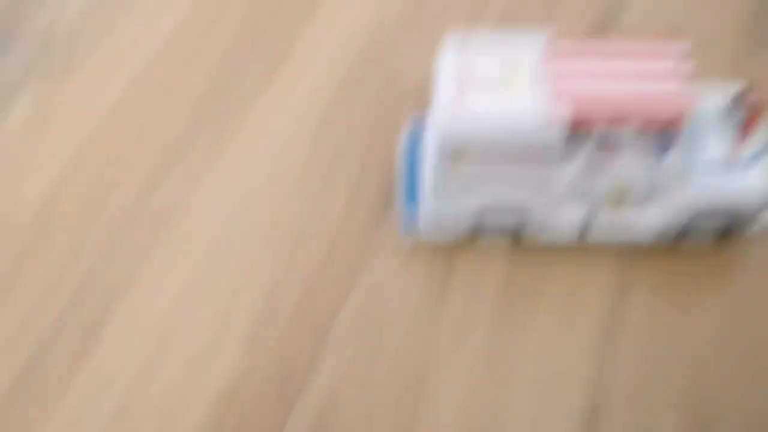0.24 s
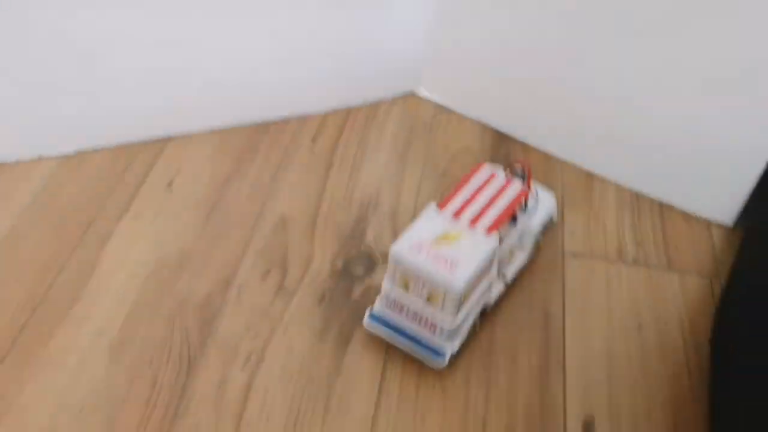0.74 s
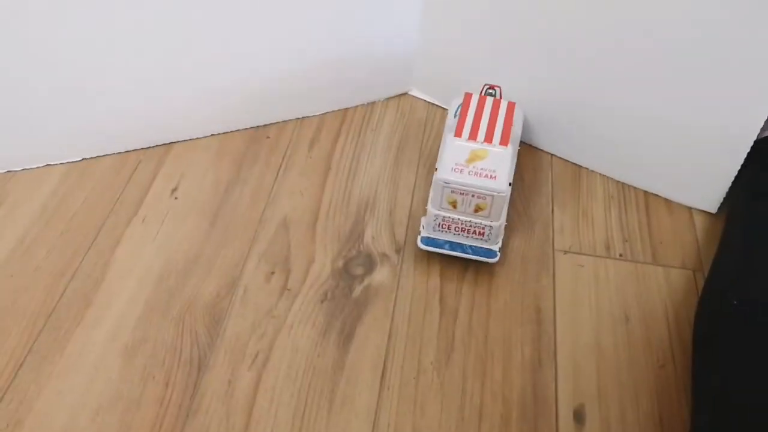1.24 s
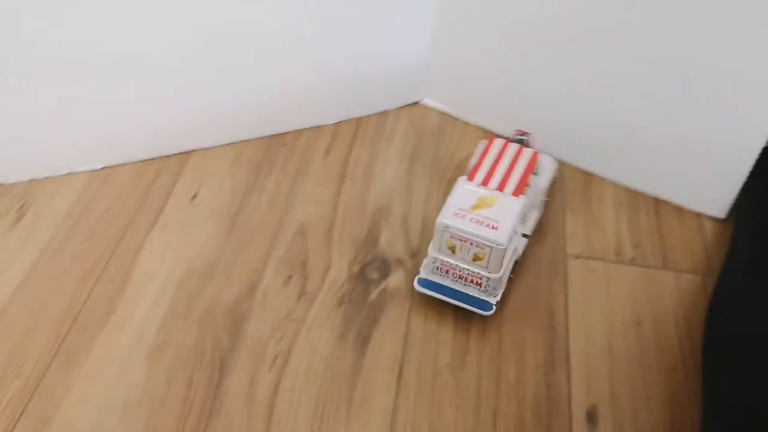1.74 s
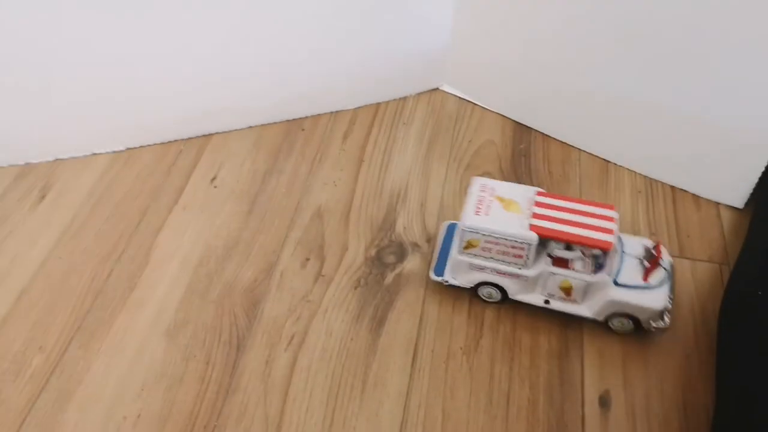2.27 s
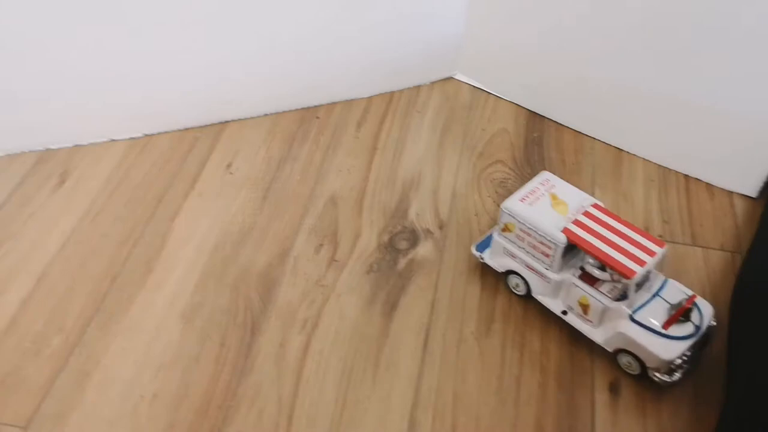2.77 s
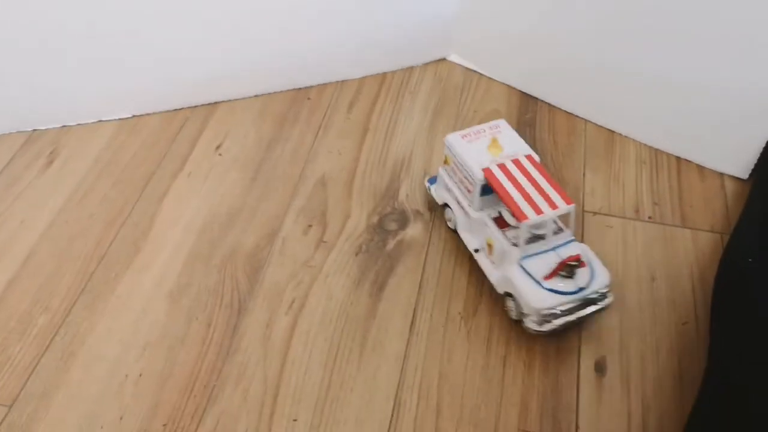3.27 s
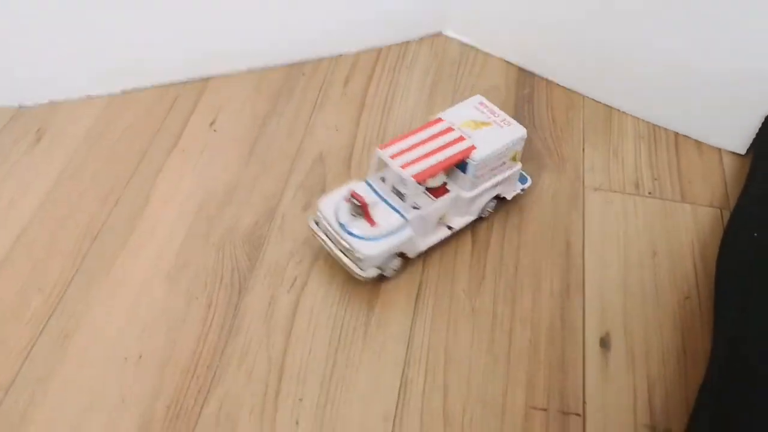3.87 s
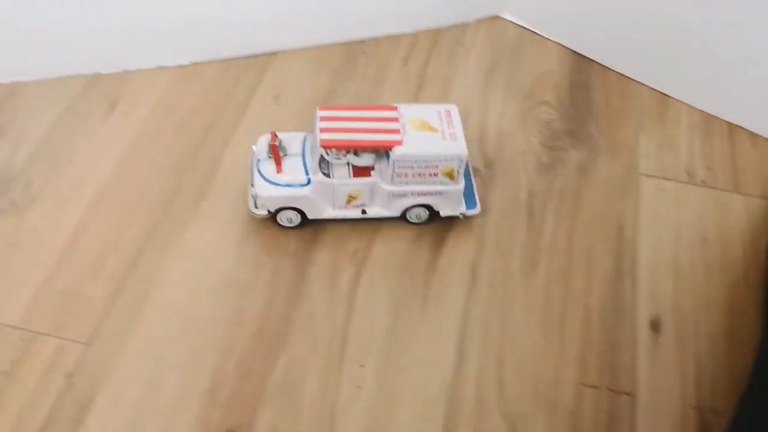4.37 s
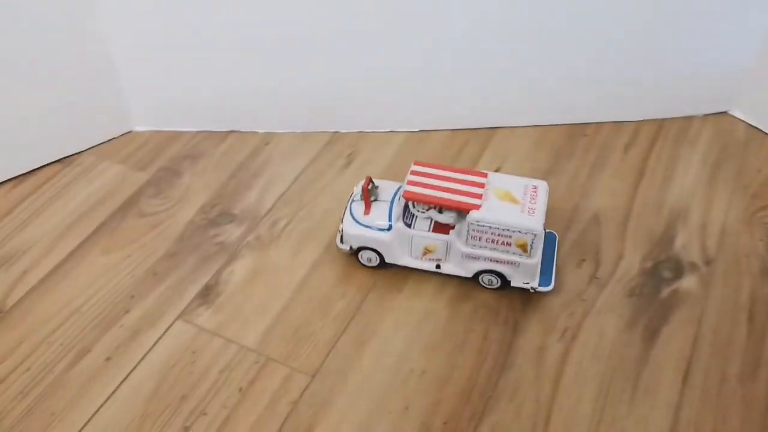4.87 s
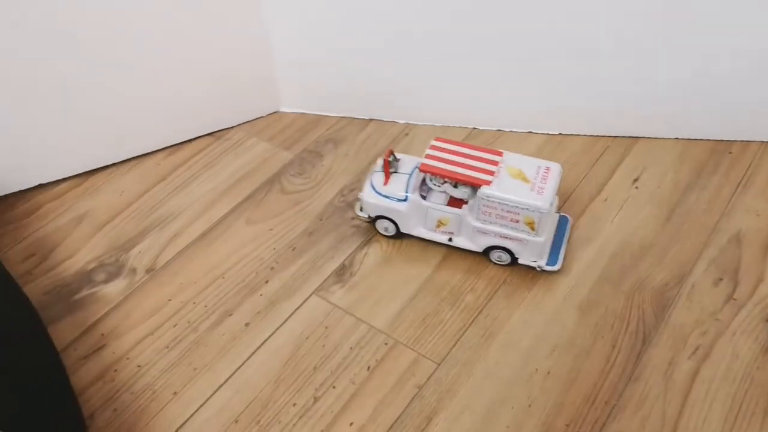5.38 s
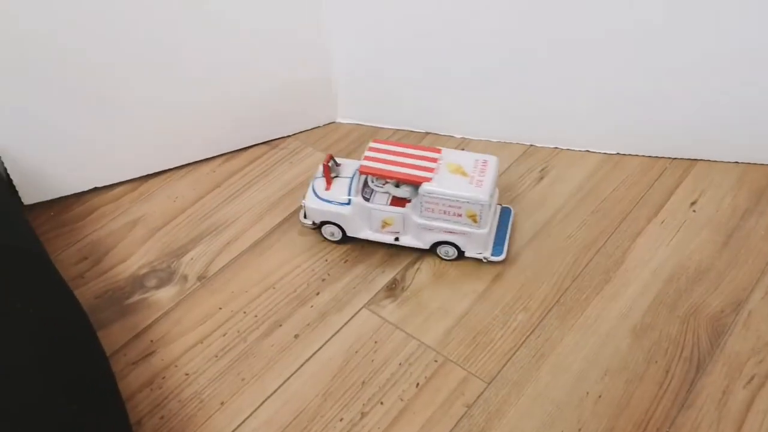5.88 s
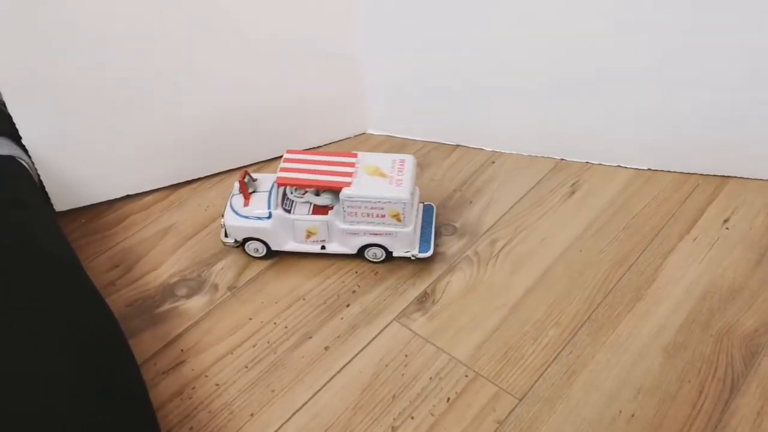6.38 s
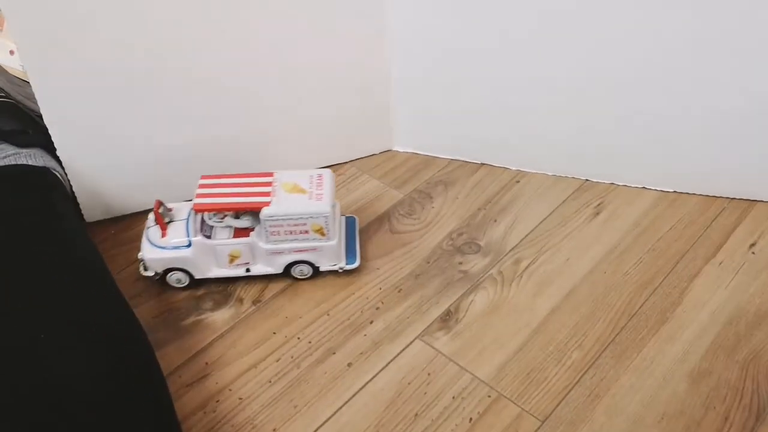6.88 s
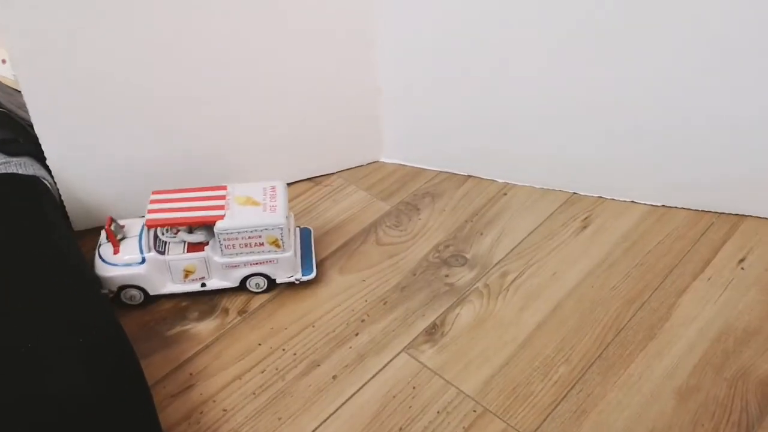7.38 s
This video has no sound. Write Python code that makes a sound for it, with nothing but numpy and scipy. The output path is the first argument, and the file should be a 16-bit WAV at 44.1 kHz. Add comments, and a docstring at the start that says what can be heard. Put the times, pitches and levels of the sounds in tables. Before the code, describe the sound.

Rapid metallic clockwork buzzing with a thin high ringing from a tin toy rolling over floorboards, lurching unevenly, a few soft knocks near the start.

```python
"""In the corner of a room, a wind-up tin truck runs about a wooden floor close to a hand-held phone.
Loose gears clash: a bright steel part rings, and gear wheels, chassis and tin shell chatter through resonances.
Random bumps drum on the floorboards and rubber scuffs; shell and wheels grow loud with speed and nearness.
The truck lurches about three times a second; its gears now and then run slack while the spring runs down.
Early dull thumps are short pushes ringing damped tones; hand rumble and a low room drone are filtered noise."""
import sys
import numpy as np
from scipy import signal
from scipy.fft import rfft, irfft
from scipy.io import wavfile
from scipy.ndimage import uniform_filter1d

SR = 44100
rng = np.random.default_rng(int(sys.argv[2]) if len(sys.argv) > 2 else 0)


def wrap_up_sound(samples):
    """Save the sound to the file named by the first command line argument, as 16-bit audio."""
    columns = np.atleast_2d(samples).T
    # keep every value between -1 and 1, then stretch to whole-number steps
    tamed = np.clip(columns, -1, 1)
    steps = np.round(tamed * 32767).astype(np.int16)
    wavfile.write(sys.argv[1], SR, steps)


N = 336042
TIME = np.arange(N) / SR

# the truck's run: (t/s, distance from the phone/m, speed/(m/s), heading/degrees: 0 away from the phone, 90 right)
TRUCK_PATH = [(0, 0.27, 0.26, 39), (.1, .16, 0.18, 59), (.22, 0.28, 0.47, 44), (.4, 0.35, 0.62, 57),
              (.8, 0.38, 0.4, 44), (1.4, 0.5, 0.15, 3.2), (2.1, 0.72, 0.38, 86), (2.8, 0.56, .2, 74),
              (3.2, 0.55, 0.24, 133), (3.5, 0.67, 0.39, 157), (4.1, 0.57, 0.3, 260), (4.8, 0.71, 0.36, 137),
              (5.6, 0.5, .26, 240), (6.4, 0.65, 0.3, 276), (7.62, 0.61, 0.13, 245)]
# level of the steel ring: (t/s, level/dB)
RING_LEVEL = [(0, -24.5), (.06, -24.5), (.25, -27.5), (1.4, -27), (2.1, -34.5), (2.8, -27.5), (3.4, -35.5),
              (4.1, -29.5), (5.6, -32), (7, -33.5), (7.62, -30)]
# the truck lurches on its wheels: (t/s, length/s, change of whirr level/dB, of shell level/dB, of board level/dB)
LURCHES = [(0.689, 0.049, 2.5, 3.0, 1), (0.997, 0.082, 0.5, 2, 0.5), (1.375, 0.07, 4, 0.5, 2),
           (1.591, 0.063, 1.5, 2.0, 5), (1.786, 0.062, 1.5, 3.5, 3), (2.008, 0.044, 5, 3.5, 8),
           (2.233, 0.056, 3, 7.0, 2.5), (2.449, 0.099, 1.5, 6.5, 3), (2.881, 0.024, 2, 3.5, -1),
           (3.107, 0.037, 6, 2.5, -2), (3.207, 0.096, -0.5, 2.5, 6), (3.447, 0.13, 2.5, 3, 0),
           (3.967, 0.038, 4.5, 6, 4), (4.193, 0.053, 1.5, 4, 12.5), (4.628, 0.11, 5.5, 5, 8),
           (4.902, 0.063, 2.5, 3.5, 7), (5.115, 0.061, 5, 2, 7.5), (5.345, 0.091, 5, 2.5, 8),
           (5.841, 0.102, 6, 2, 3.5), (6.128, 0.062, 2, 4.5, 6.5), (6.917, 0.084, 1.5, 3, 4.5)]
# the gears run slack and go quiet: (t/s, length/s, drop of ring level/dB, drop of whirr level/dB)
SLACK_SPELLS = [(0.577, 0.017, 11, 4), (0.701, 0.11, 4.5, 2.0), (1.014, 0.036, 6.0, 1.5),
                (1.872, 0.032, 32, 11), (2.266, 0.053, 9, 3.5), (3.366, 0.067, 4, 4),
                (3.599, 0.094, 5.5, 3.5), (4.233, 0.1, 9.5, 3.0), (4.502, 0.043, 6, 4), (4.69, 0.13, 5, 1),
                (4.907, 0.12, 7, 1), (5.195, 0.047, 17, 3), (5.41, 0.062, 9, 3.5), (5.877, 0.103, 4, 2.0),
                (6.932, 0.14, 4.5, 2)]
# at 1 m, fully wound, between lurches and slack spells; shell and wheels at cruising speed
WHIRR_DB, SHELL_DB, ROLL_DB = -43, -40, -59
CRUISE_M_S, SAG_DB_PER_S = .25, 0.25
SHELL_DB_PER_DOUBLING, ROLL_DB_PER_DOUBLING = 2, 5.5  # growth with speed
SHELL_SLACK_SHARE = 0.5  # how much of the whirr's drop the shell follows


def effort():
    """Levels in dB of ring, whirr, shell and wheels: a closer truck whirrs louder, a weaker spring drives less."""
    metres, speed, _ = curves(TRUCK_PATH)
    near = -20 * np.log10(np.maximum(metres, .05))
    doublings = np.log2(np.maximum(speed, .01) / CRUISE_M_S)
    driven = near - SAG_DB_PER_S * TIME
    whirr_rise, shell_rise, board_rise = spells(LURCHES)
    ring_drop, whirr_drop = spells(SLACK_SPELLS)

    ring_db = curves(RING_LEVEL)[0] - ring_drop
    whirr_db = WHIRR_DB + driven + whirr_rise - whirr_drop
    shell_db = SHELL_DB + driven + SHELL_DB_PER_DOUBLING * doublings
    shell_db = shell_db + shell_rise - SHELL_SLACK_SHARE * whirr_drop
    roll_db = ROLL_DB + near + ROLL_DB_PER_DOUBLING * doublings + board_rise
    return ring_db, whirr_db, shell_db, roll_db


# how each part's share changes as the truck turns, by part name:
# (mean level/dB, swing either way between face-on and edge-on/dB, lean to one face/dB, heading of that face/degrees)
PART_LOBES = {"floor pan": (-4.5, 3, -0.5, 273.5), "sides": (0, -1, -1, 207), "roof": (0, 1.5, 0.5, 287),
              "bonnet": (-.5, 1, 0, 67), "bumper": (-.5, 1, 0, 67), "chassis": (-2, 0.5, 1.5, 97),
              "gear wheels": (1.6, 1.9, 0.25, 287)}
# a loose part catches and buzzes above the rest: (t/s, length/s, part name, rise of level/dB)
PART_BUZZES = [(0, 0.44, "chassis", 3), (0.593, 0.17, "roof", 4.5), (2.75, .07, "roof", 5),
               (2.814, 0.07, "floor pan", 8), (3.05, .13, "chassis", 3.5), (3.355, 0.74, "sides", 4.5),
               (4.197, .3, "chassis", 3.5), (4.2, .07, "floor pan", 7), (4.443, 0.31, "floor pan", 7.5),
               (5.05, 0.87, "gear wheels", 4), (4.92, 0.52, "floor pan", 4.5), (5.843, 0.43, "roof", 4),
               (6.45, 0.31, "gear wheels", 0.5), (6.62, 0.29, "bumper", 2.5)]
PART_WANDER_PER_S, PART_WANDER_DB = 8, 0.68  # a loose part's share wanders


def facing(part):
    """A part's share in dB: it changes with the truck's heading, wanders on its loose seat and may buzz."""
    mean_db, swing_db, lean_db, face_heading = PART_LOBES[part]
    angle = np.radians(curves(TRUCK_PATH)[2] - face_heading)
    turn_db = mean_db + swing_db * np.cos(2 * angle) + lean_db * np.cos(angle)
    buzz_db = 0
    for s, length_s, name, rise_db in PART_BUZZES:
        if name == part:
            buzz_db = buzz_db + rise_db * swell(s, length_s, ATTACK_S, RELEASE_S)
    return turn_db + buzz_db + PART_WANDER_DB * wander(PART_WANDER_PER_S)


# average pace of tooth clashes as the spring unwinds: (t/s, about how many clashes per second)
CLASH_PACE = [(0, 137), (3, 125), (7.62, 110)]


def clashes(jitter, spread_db, length_s):
    """Loose teeth clash at an uneven pace, each with its own force."""
    chance = rng.standard_normal((1400, 2))
    turns = np.cumsum(curves(CLASH_PACE)[0]) / SR
    gaps = np.exp(jitter * chance[:, 0])
    times = np.interp(np.cumsum(gaps), turns, TIME, right=TIME[-1] + 1)
    sizes = undb(spread_db * np.minimum(chance[:, 1], 2))
    return even(bursts(times, sizes, length_s))


# place between the phone's two sound openings: (t/s, left over right level/dB of the ring, of the whirr, of the shell)
TURN_BALANCE = [(0, -13, 4.5, -1), (.54, -19, -4, -3.5), (1.76, -16.5, -0.5, -3), (2.56, -15, 1, 0.5),
                (3.1, -17, 0, -1.5), (3.74, -14, -0.5, 2), (4.26, -16, 1, -1.5), (4.94, -15, -3, -3.5),
                (5.92, -21, 0.5, -3.5), (7.62, -21, -2, -1.5)]
# teeth that snap hard into mesh: (t/s, relative level/dB, gear train's level against that/dB)
TOOTH_SNAPS = [(0.0626, -5, -13), (0.203, -9, -12), (0.242, -12.5, -5.5), (0.571, -15, -24),
               (0.784, -8, -19), (1.2935, -25, -13), (1.863, -13.5, -26), (1.9336, -19, -27),
               (2.326, -21.5, -17), (2.6456, -20, -30), (2.885, -14, -26), (3.0395, -22, -19),
               (3.4426, -19, -21), (3.8015, -12, -22), (3.845, -17, -13), (4.2027, -25, -26),
               (4.8213, -18, -16), (4.904, -21, -7), (4.958, -16.5, -11), (5.1385, -19, -3.5),
               (5.1825, -17, -14), (5.2236, -18, -8), (5.374, -18, -8), (5.623, -18, -6), (6.411, -15, -12),
               (6.5267, -15.5, -8.5), (6.84, -13.5, -30), (6.874, -13, -19), (7.141, -24, -20)]
# resonances of the steel part: (f/Hz, width/Hz, relative level/dB)
STEEL_RESONANCES = [(9440, 380, -14), (9887, 148, 6), (9700, 200, -3), (11040, 900, -35)]
RING_FLUTTER_PER_S, RING_FLUTTER_DB = 61, 3.2  # the teeth press unevenly on the steel part


def steel(clash, level_db):
    """A steel part sings for as long as a tooth rubs past it: short, bright, separate chirps."""
    s, snap_db, _ = np.transpose(TOOTH_SNAPS)
    song = even(colour(ports(1, 15000, shared=0.64), STEEL_RESONANCES, skirt=41), size=110)
    contact = even((clash + 0.32) * undb(RING_FLUTTER_DB * wander(RING_FLUTTER_PER_S)))
    snaps = bursts(s, undb(snap_db - 8.0), 0.0023)
    pressure = contact * undb(level_db) + snaps
    sound = radiate(song * pressure, near_db=-5, room_db=-9, near_s=.004, alike=.3)
    return sound * pan(curves(TURN_BALANCE)[0])


# resonances of the chassis, the gear frame and the gear wheels: each (f/Hz, width/Hz, relative level/dB)
CHASSIS_RESONANCES = [(3560, 940, 2.5), (4020, 610, -4.5), (4416, 250, 5)]
FRAME_RESONANCES = [(4926, 230, -1.5), (5370, 350, -1), (5883, 170, 0), (6310, 220, -5.5)]
GEAR_WHEEL_RESONANCES = [(7120, 240, 6), (7630, 280, 4), (8450, 510, -3.5), (12300, 4500, -17)]


def works(clash, level_db):
    """Each clash is also a chatter of tiny impacts in the gear wheels, their frame and the chassis."""
    s, snap_db, frame_db = np.transpose(TOOTH_SNAPS)
    chatter = ports(clash + 1.2, 5000, shared=0.011) * undb(level_db)
    snaps = bursts(s, undb(snap_db + frame_db), 0.00088) * ports(1, 9000, shared=0.025)
    parts = [(CHASSIS_RESONANCES, facing("chassis")), (FRAME_RESONANCES, 0),
             (GEAR_WHEEL_RESONANCES, facing("gear wheels"))]
    sound = blend(chatter + snaps, parts, skirt=11.9)
    sound = radiate(sound, near_db=0.0, room_db=-14, near_s=0.0069, alike=0.031)
    return sound * pan(curves(TURN_BALANCE)[1])


# the shell knocks on its chassis: (t/s, relative level/dB)
SHELL_KNOCKS = [(0.0994, -16), (0.12, -26), (0.2009, -9.5), (1.001, -17), (2.03, -18), (2.293, -18),
                (3.228, -12.5), (3.26, -18.5), (3.991, -21), (4.736, -14), (4.7656, -25), (5.1617, -18),
                (5.902, -16)]
# resonances of the tin panels: each (f/Hz, width/Hz, relative level/dB)
FLOOR_PAN_RESONANCES = [(1094, 36, -6.5), (1187, 79, -4), (1350, 190, -13)]
SIDE_RESONANCES = [(1563, 150, -9.5), (1667, 74, -5)]
ROOF_RESONANCES = [(1841, 130, -1), (1970, 250, 0.025)]
BONNET_RESONANCES = [(2230, 620, -2.3), (2410, 140, 3.3)]
BUMPER_RESONANCES = [(2581, 195, 5.5), (2823, 890, -3)]


def shell(clash, level_db):
    """The tin body buzzes with the gears, jiggles over the grain of the wood and now and then knocks."""
    chance = rng.random((700, 2))
    jiggle = even(bursts(chance[:, 0] * TIME[-1], undb(14.4 * chance[:, 1]), 0.0019))
    buzz = ports(jiggle + 0.77 * clash + 1.7, 4000, shared=0.44) * undb(level_db)
    s, knock_db = np.transpose(SHELL_KNOCKS)
    knocks = bursts(s, undb(knock_db - 6), 0.003) * ports(1, 9000, shared=0.65)
    panels = [(FLOOR_PAN_RESONANCES, facing("floor pan")), (SIDE_RESONANCES, facing("sides")),
              (ROOF_RESONANCES, facing("roof")), (BONNET_RESONANCES, facing("bonnet")),
              (BUMPER_RESONANCES, facing("bumper"))]
    sound = blend(buzz + knocks, panels, skirt=39.6)
    sound = radiate(sound, near_db=-7.0, room_db=-4, near_s=0.0039, alike=0.27)
    return sound * pan(curves(TURN_BALANCE)[2])


# the boards under the wheels change: (t/s, relative level of the deep resonances/dB)
DEEP_BOARD_SHARE = [(0, -2), (.6, -7.5), (1.6, -5), (2.8, -10.5), (4, -5), (4.7, -1.5), (5.3, -1),
                    (6.2, -3.5), (7, -8), (7.62, -6)]
# deep and high resonances of the boards: each (f/Hz, width/Hz, relative level/dB)
DEEP_BOARD_RESONANCES = [(171, 54, -18.5), (292, 87, 1), (323, 30, 3), (355, 16, 0)]
HIGH_BOARD_RESONANCES = [(433.5, 42, -1.5), (488, 32, -1.5), (725, 16, -10.5), (818, 32, -1),
                         (980, 72, -2.5)]


def wheels(level_db):
    """Small bumps under the wheels drum on the floorboards."""
    bumps = np.array([even(impacts(700)) for _ in range(2)]) * undb(level_db)
    parts = [(DEEP_BOARD_RESONANCES, curves(DEEP_BOARD_SHARE)[0]), (HIGH_BOARD_RESONANCES, -2)]
    boards = blend(bumps, parts, skirt=19.2)
    return diffuse(radiate(boards, near_db=-22.5, room_db=-4.5, near_s=0.0061, alike=0))


# the spinning tyres scuff as the truck is let go, then bite: one row (t/s, length/s, rise of level/dB)
TYRE_GRIP = (0.17, 0.022, 13.3)
# what the scuff rings: (f/Hz, width/Hz, relative level/dB)
TYRE_RESONANCES = [(700, 130, 8), (830, 150, 1), (966, 130, -3)]
SCUFF_DB, SCUFF_FADE_DB_PER_S = -45, 17  # starting level without the bite, and its fade


def scuff():
    """Rubber slips on the wood in tiny jerks, loudest for a moment as it bites, and fades."""
    level_db = SCUFF_DB - SCUFF_FADE_DB_PER_S * TIME + spells([TYRE_GRIP])[0]
    jerks = ports(1, 2500, shared=0) * undb(level_db)
    return colour(jerks, TYRE_RESONANCES, skirt=27)


# dull thumps: (t/s, relative level/dB, contact time/s)
THUMP_BLOWS = [(0.089, -12.5, 0.0026), (0.177, -20, 0.00075), (0.185, -14, 0.00088), (.200, -16, 0.00081),
               (0.333, -14, 0.0028), (0.345, -3.5, 0.0045), (1.095, 1, .0013), (1.110, 5, 0.0025),
               (1.139, -10, 0.00075), (1.15, 9.5, 0.0056), (1.187, -9, 0.0014), (1.215, 7.5, 0.0079),
               (1.246, -7, 0.0044), (1.276, -5, 0.0041)]
# what a thump rings: (f/Hz, time to fall by 60 dB/s, relative level/dB)
THUMP_RESONANCES = [(73.8, 0.28, -16.5), (114.7, 0.33, -13), (158.5, 0.099, -7.5), (218, 0.041, -2),
                    (300, 0.072, -0.5), (358, 0.12, -14), (460, 0.021, -37), (750, 0.032, -3),
                    (855, 0.11, -10), (990, .04, -11), (1240, .04, -10)]


def thumps(width_db=-2):
    """Soft blows that bounce; the longer the contact, the duller the blow. The modes lean left and right in turn."""
    force = np.zeros(N)
    for s, db, contact_s in THUMP_BLOWS:
        push = np.sin(np.pi * np.clip((TIME - s) / contact_s, 0, 1))
        force -= undb(db) * push / push.sum()
    t = TIME[:SR // 2]
    modes = []
    for hz, t60, db in THUMP_RESONANCES:
        decay = np.exp(-np.log(1000) * t / t60)
        modes.append(undb(db) * np.cos(2 * np.pi * hz * t) * decay)
    modes = np.array(modes)
    lean = undb(width_db) * (-1) ** np.arange(len(modes))
    centre_and_width = convolve(force, [modes.sum(0), lean @ modes])
    blows = undb(-12.5) * diffuse(centre_and_width)
    return radiate(blows, near_db=-15, room_db=-10, near_s=.0047, alike=.94)


# the phone swings round at the start: one row (t/s, length/s, sub-bass level/dB)
PHONE_SWING = (0.093, 0.13, -29.5)
SWING_ATTACK_S, SWING_RELEASE_S = .04, .06
HAND_DB, HAND_FADE_DB_PER_S = -34, 24  # starting rumble of the hand, and its fade as it settles


def handling(low_hz=9, high_hz=24):
    """Air pushes slowly on both openings while the phone swings; then the hand settles."""
    band = signal.butter(2, [low_hz, high_hz], "bandpass", fs=SR, output="sos")
    air = signal.sosfilt(band, rng.standard_normal(N))
    s, length_s, db = PHONE_SWING
    swing = undb(db) * swell(s, length_s, SWING_ATTACK_S, SWING_RELEASE_S)
    hand = undb(HAND_DB - HAND_FADE_DB_PER_S * TIME)
    return even(air, size=6000) * (swing + hand)


# shape of the room drone: (f/Hz, relative level in each Hz/dB)
DRONE_SPECTRUM = [(10, -6.5), (22, -4), (30, -1), (40, -7), (51, -8.5), (57, -14), (63, 4), (70, -4.5),
                  (79, -11.5), (88, -10.5), (110, -16), (150, -21.5), (220, -31), (600, -52), (4000, -60)]
DRONE_DB = -38


def drone():
    """Steady low room noise from all round."""
    hz, db = np.transpose(DRONE_SPECTRUM)
    bin_hz = np.arange(N // 2 + 1) * SR / N + 1
    gain = undb(np.interp(np.log(bin_hz), np.log(hz), db))
    noise = irfft(rfft(rng.standard_normal((2, N))) * gain, N)
    return undb(DRONE_DB) * diffuse(even(noise, size=12000))


ROOM_T60_S = 0.18  # time for the room's tail to fall by 60 dB


def radiate(sound, near_db, room_db, near_s, alike, size=8192):
    """Direct sound, quick scatter from floor and corner, and the room's tail; echo paths change piece by piece."""
    t, alike = TIME[:2 * size], np.clip(alike, 0, 1)
    near = np.exp(-t / near_s)
    tail = np.exp(-np.log(1000) * t / ROOM_T60_S) * (t > .006)
    near_gain = undb(near_db) * near / np.linalg.norm(near)
    tail_gain = undb(room_db) * tail / np.linalg.norm(tail)
    spread = np.hypot(near_gain, tail_gain)
    padded = np.pad(sound, ((0, 0), (size, 4 * size)))
    echoes, fade = np.zeros_like(padded), np.sqrt(np.hanning(size))
    for start in range(0, N + size, size // 2):
        common = rng.standard_normal(len(t))
        separate = rng.standard_normal((2, len(t)))
        paths = np.sqrt(alike) * common + np.sqrt(1 - alike) * separate
        piece = signal.fftconvolve(padded[:, start:start + size] * fade, spread * paths, axes=1)
        echoes[:, start:start + piece.shape[1]] += piece
    return (sound + echoes[:, size:size + N]) / np.sqrt(1 + np.sum(spread ** 2))


PORTS_ALIKE_HZ = 810  # longer waves reach both openings alike


def diffuse(pair):
    """Sound from all round: two versions become centre and width, and the width loses its bass."""
    mid, side = pair
    side = signal.sosfilt(signal.butter(1, PORTS_ALIKE_HZ, "highpass", fs=SR, output="sos"), side)
    return np.array([mid + side, mid - side])


def blend(force, parts, skirt):
    """One force rings several parts (modes, dB curve), which share its power."""
    total = np.sqrt(sum(undb(db) ** 2 for _, db in parts))
    return sum(undb(db) * colour(force, modes, skirt) for modes, db in parts) / total


def colour(force, modes, skirt, size=4096):
    """Ring a set of resonances, keeping the power; skirt (dB per octave) steepens the fall outside their range."""
    hz = np.arange(size // 2 + 1) * SR / size + 1
    power = sum(undb(db) ** 2 / (1 + (2 * (hz - f) / width) ** 2) for f, width, db in modes)
    octaves_outside = np.abs(np.log2(hz / np.clip(hz, modes[0][0], modes[-1][0])))
    skirt_gain = undb(-skirt * np.minimum(octaves_outside, 2))
    cepstrum = irfft(np.log(power) / 2 + np.log(skirt_gain))
    cepstrum[1:size // 2] *= 2  # folding the cepstrum lets the ringing start only after the blow
    cepstrum[size // 2 + 1:] = 0
    response = irfft(np.exp(rfft(cepstrum)))
    return convolve(force, response / np.linalg.norm(response))


def ports(envelope, rate, shared):
    """Impacts lie all over the toy, so the phone's two openings share only some of them."""
    shared = np.clip(shared, 0, 1)
    common = impacts(rate)
    sides = []
    for _ in range(2):
        mixed = np.sqrt(shared) * common + np.sqrt(1 - shared) * impacts(rate)
        sides.append(even(envelope * mixed))
    return unit(np.array(sides))


def impacts(rate):
    """Tiny impacts at random moments, about rate a second, rms about 1."""
    return rng.standard_normal(N) * (rng.random(N) < rate / SR) * np.sqrt(SR / rate)


def bursts(times, sizes, length_s):
    """Envelope of contacts that swell for length_s and then die away."""
    samples = np.clip(np.asarray(times) * SR, 0, N).astype(int)
    kicks = np.bincount(samples, sizes, N + 1)[:N]
    age = TIME[:4096] / length_s
    return convolve(kicks, (age * np.exp(1 - age)) ** 2)[0]


def convolve(x, response):
    """One force through a left and a right response."""
    return signal.fftconvolve(np.atleast_2d(x), np.atleast_2d(response), axes=1)[:, :N]


def swell(s, length_s, attack_s, release_s):
    """Attack, hold and release, from 0 to 1 and back."""
    rise = np.clip((TIME - s) / attack_s, 0, 1)
    fall = np.clip((s + length_s + release_s - TIME) / release_s, 0, 1)
    return rise * fall


ATTACK_S, RELEASE_S = 0.014, 0.018  # of a lurch, slack spell, buzz or tyre bite


def spells(table):
    """Rows of (s, length, amounts) summed into one curve per amount."""
    rows = np.array(table)
    shapes = [swell(s, length_s, ATTACK_S, RELEASE_S) for s, length_s in rows[:, :2]]
    return rows[:, 2:].T @ np.array(shapes)


def wander(rate, size=2000):
    """Random values, rate a second, joined by straight lines."""
    return np.interp(TIME * rate, np.arange(size), rng.standard_normal(size))


def curves(table):
    """Each column of a table, joined by straight lines in time."""
    s, *columns = np.transpose(table)
    return [np.interp(TIME, s, c) for c in columns]


def pan(db):
    """Left and right gains of constant power, db apart."""
    gains = undb(np.array([db, -db]) / 2)
    return gains / np.sqrt(np.mean(gains ** 2, axis=0))


def even(x, size=3500):
    """Hold the running strength at 1 over size samples, leaving the fast grain."""
    return x / np.sqrt(np.abs(uniform_filter1d(x ** 2, size)) + 1e-12)


def unit(x):
    """Scale a stereo sound so that its centre has rms 1."""
    return x / np.sqrt(np.mean(x.mean(0) ** 2))


def undb(db):
    """Decibels to gain."""
    return 10 ** (np.asarray(db) / 20)


def scene():
    """Gear clashes drive the steel part, the works and the shell; wheels, scuff, thumps, hand and room join them."""
    clash = clashes(jitter=.24, spread_db=2.8, length_s=.0021)
    ring_db, whirr_db, shell_db, roll_db = effort()
    gears = steel(clash, ring_db) + works(clash, whirr_db)
    truck = gears + shell(clash, shell_db) + wheels(roll_db) + scuff()
    return truck + thumps() + handling() + drone()


TOP_HZ = 15250


def record(dry):
    """The phone cuts the top: a steep low-pass filter."""
    return signal.sosfilt(signal.ellip(10, .2, 80, TOP_HZ, fs=SR, output="sos"), dry)


dry = scene()
out = record(dry)
wrap_up_sound(out)
```